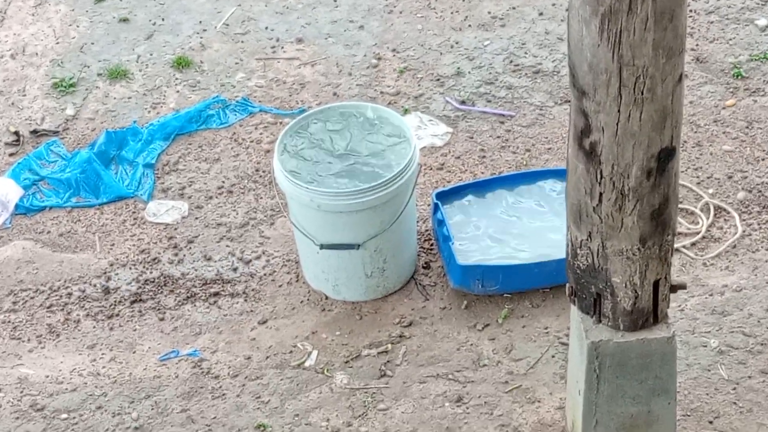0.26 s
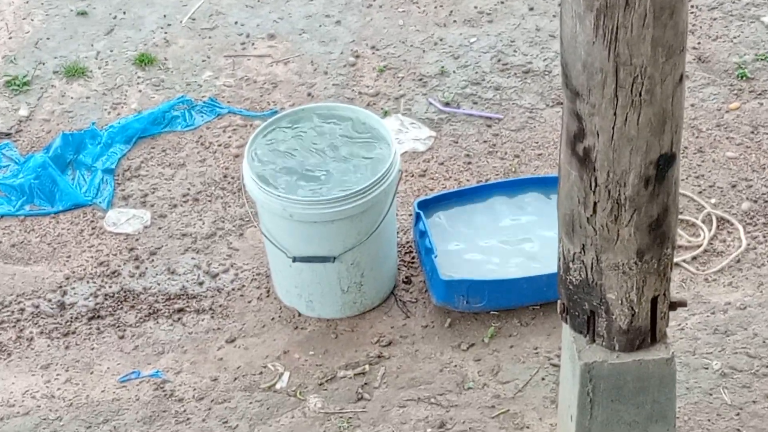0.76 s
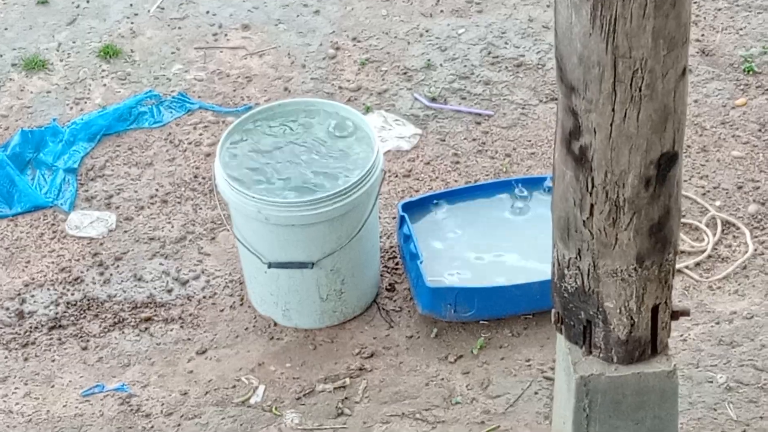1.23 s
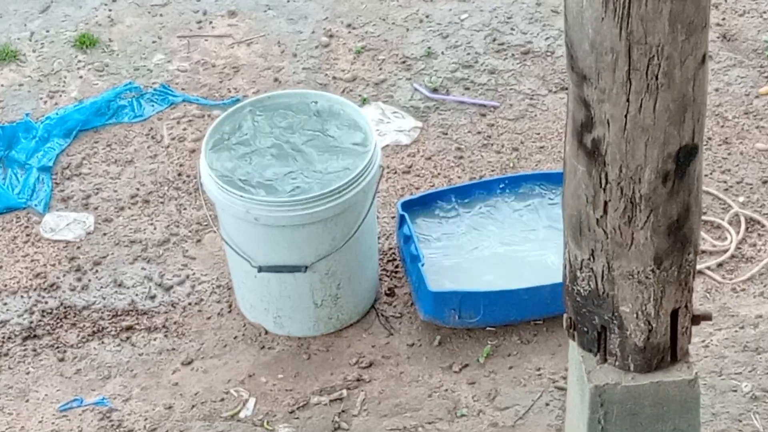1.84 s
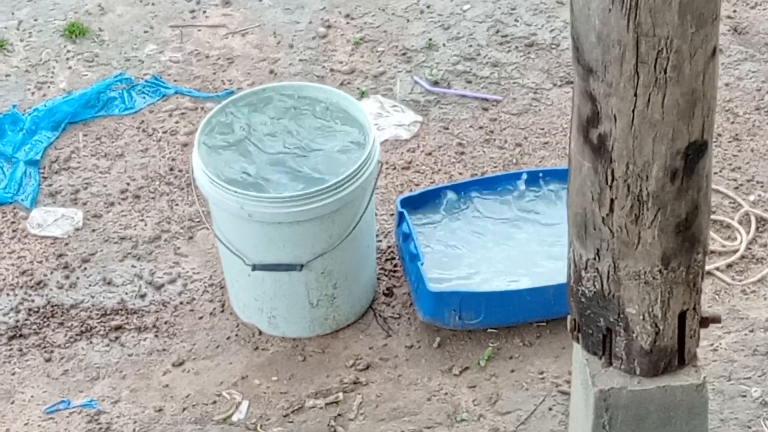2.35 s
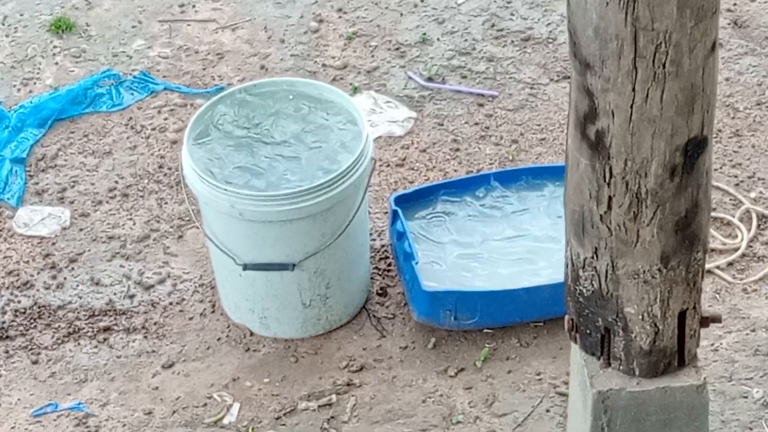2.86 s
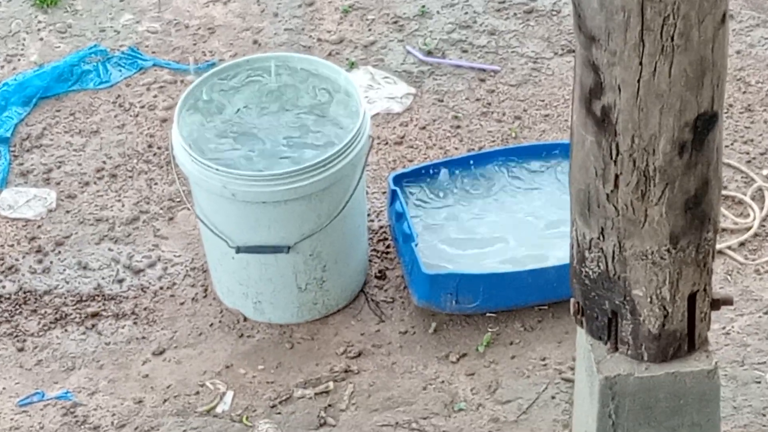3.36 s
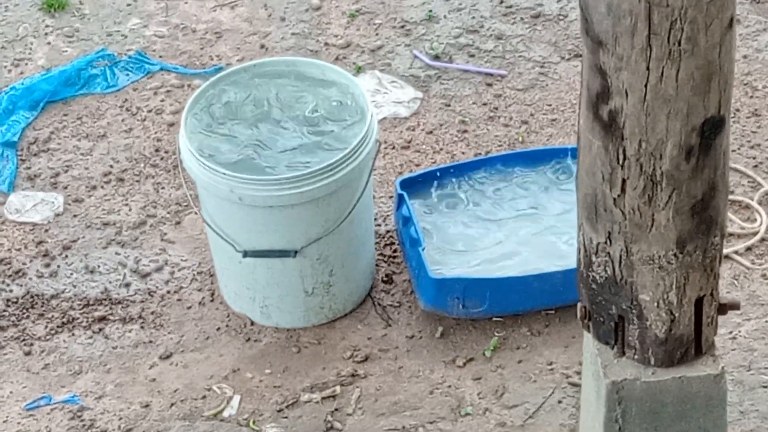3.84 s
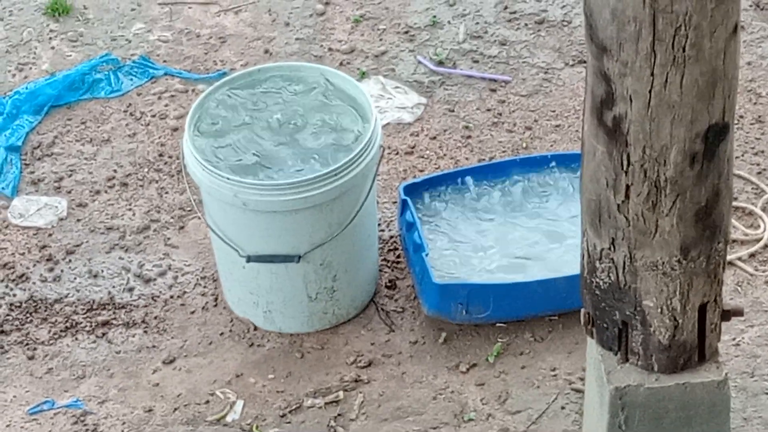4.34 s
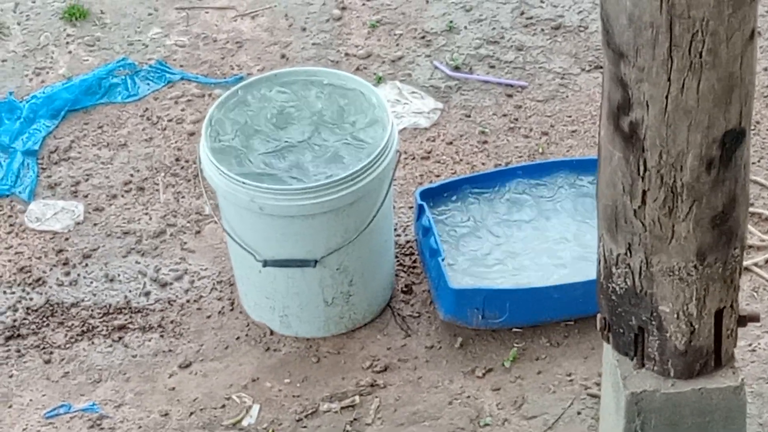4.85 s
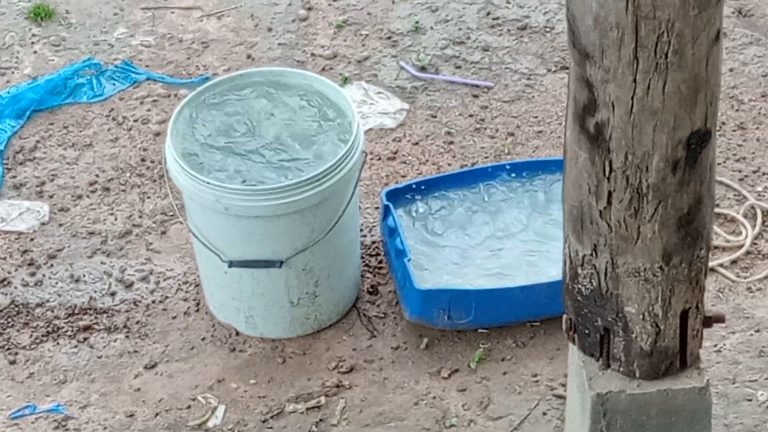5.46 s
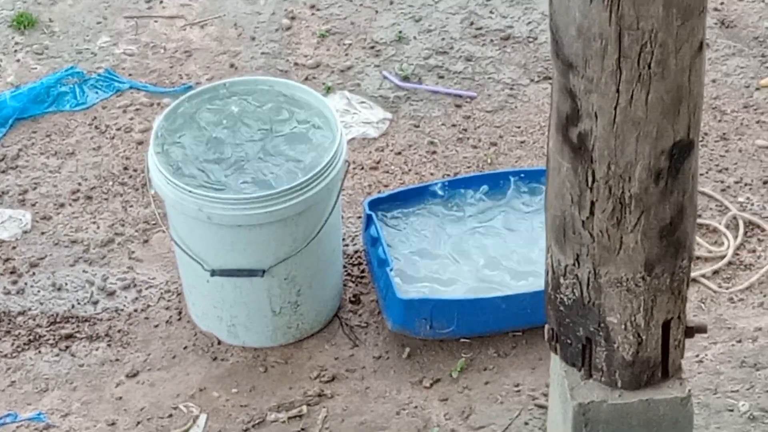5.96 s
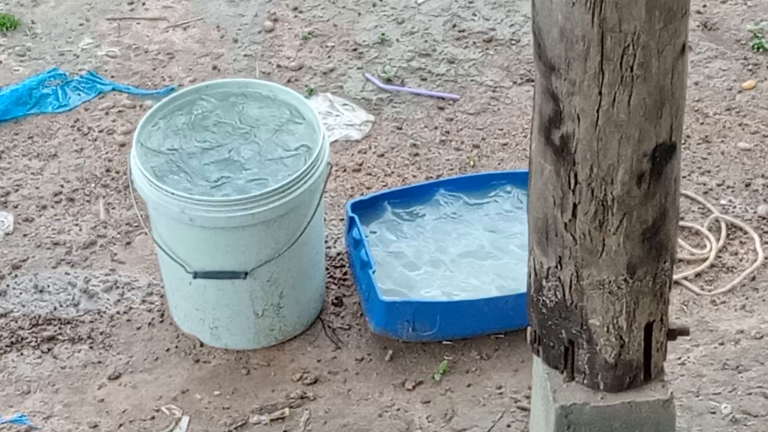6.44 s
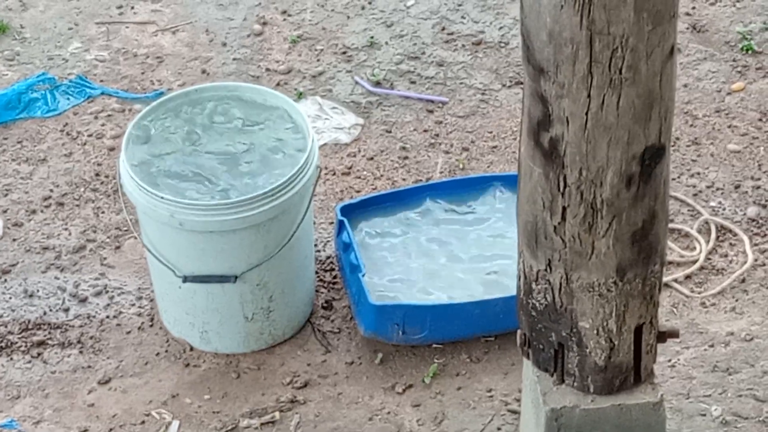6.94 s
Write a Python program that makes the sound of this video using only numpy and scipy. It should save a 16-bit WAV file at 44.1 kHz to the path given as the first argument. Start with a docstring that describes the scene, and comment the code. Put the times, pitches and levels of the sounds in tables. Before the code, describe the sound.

Continuous downpour heard from beneath a roof sheet, outdoors. Thousands of overlapping drops make a rattling, midrange-bright roar that wavers slightly, briefly dipping around a third of the way through and easing near the end. Heavy drops smack the sheet at random. Clear watery plinks stand out from containers nearby, most strongly early and midway, over faint rumble, dull knocks and distant rain hiss.

```python
"""Rain under a sheet roof

A farm yard in steady rain, with the microphone under a sheet roof.
Overhead, random drops keep noise bands ringing in a dense, bright wash; listed heavy drops splash out of it.
Close by, drops excite short resonances on wet ground, hiss on mud, and trap bubbles (decaying sines)
in a full bucket and a tub. Behind lie a soft drumming, a few dull knocks and hiss from across the yard."""
import sys
import numpy as np
from scipy import signal
from scipy.fft import rfft, irfft
from scipy.io import wavfile

SR = 44100
rng = np.random.default_rng(int(sys.argv[2]) if len(sys.argv) > 2 else 0)


def master(y):
    """Save y as 16-bit WAV."""
    cut = np.clip(np.atleast_2d(y).T, -1, 1)
    pcm = np.round(cut * 32767)  # scale
    wavfile.write(sys.argv[1], SR, pcm.astype(np.int16))


N = 317520

# All spectra are relative: each noise is scaled to rms 1 before its level is set.
# strength of the shower: (time [s], level [dB])
SHOWER = [(0.0, -1.5), (0.45, -0.7), (0.95, 0.5), (1.33, -1.1), (1.48, 1.2), (1.9, 0.5), (2.25, 0),
          (2.39, -3.5), (2.5, 0), (2.85, 0.9), (3.24, 0.4), (3.6, 0.7), (4.9, 0.6), (5.15, -0.64),
          (5.92, -0.2), (6.1, -1), (6.6, -2), (7.2, -1.7)]
# broad ring of the roof sheet: (frequency [Hz], density [dB per Hz])
ROOF_SPECTRUM = [(500, -32), (1100, -13.5), (1400, -14.5), (1650, -8), (1900, -3.5), (2400, -0.5),
                 (2750, -4), (3150, -6.5), (3700, -2.5), (4150, -8.5), (4800, -17.5), (5700, -25.5),
                 (8000, -33.5), (16000, -59)]
# fine spray of bursting drops: (frequency [Hz], density [dB per Hz])
SPRAY_SPECTRUM = [(2500, -27), (4500, 7), (6000, -3), (7000, -2.5), (7700, -7.5), (8800, -3), (9500, -3.5),
                  (10400, -13), (11500, -15.5), (12800, -21), (15500, -35)]
# heavy drops on the roof: (time [s], splash drive [dB], sheet drive [dB])
HEAVY_DROPS = [(0.3465, -35, -21), (0.4178, -33, -30), (0.5515, -36, -36), (0.8794, -38, -26),
               (1.2619, -38, -22), (1.4244, -47, -17.5), (1.5940, -41, -21), (1.7850, -44, -22),
               (1.8294, -34, -36), (1.9394, -33.5, -18), (2.1144, -34, -19.5), (2.2262, -32, -19),
               (2.3116, -39, -20.5), (2.4250, -45, -20), (2.4994, -35, -32), (2.6958, -39, -22),
               (2.8300, -43, -19), (3.0994, -41, -22), (3.3831, -33, -24.5), (3.4480, -36, -23),
               (3.5994, -35, -22), (3.6230, -44, -22), (3.7084, -29, -21.5), (4.4222, -35, -26),
               (4.5060, -35, -33), (4.5480, -36, -20), (4.74, -34, -18), (4.8323, -33, -37),
               (4.9121, -31, -24), (4.9294, -37, -21), (6.0494, -37, -19.5), (6.0979, -36, -19.5),
               (6.3294, -38, -21.5), (6.851, -34, -23), (6.9595, -37, -19.5), (7.0420, -36, -21.5)]
# splash of a large drop: (frequency [Hz], density [dB per Hz])
SPLASH_SPECTRUM = [(2500, -25), (4500, 7.5), (6000, 4), (7700, -6.5), (9500, -0.5), (11500, -14.5),
                   (13000, -20), (15500, -24)]
# low resonance of the sheet: (frequency [Hz], density [dB per Hz])
LOW_RING_SPECTRUM = [(400, -20), (740, -7), (875, 4.5), (970, 3.5), (1035, 1), (1085, -0.5), (1200, -5),
                     (2000, -41.5)]
# runs of drips that swell the low resonance: (start [s], length [s], level [dB])
DRIP_RUNS = [(0.076, 0.15, -31), (0.555, 0.12, -30), (0.908, 0.24, -33.5), (2.075, 0.11, -30.5),
             (2.53, 0.068, -27.5), (2.82, 0.22, -32.5), (3.37, 0.15, -32), (4.635, 0.15, -33.5),
             (4.85, 0.092, -32), (6.03, 0.15, -33.5)]
# resonances of a near drop on wet ground: (frequency [Hz], width [Hz], relative gain [dB])
TICK_MODES = [(970, 1150, 3), (2420, 930, -0.5), (3700, 400, -23), (6300, 1800, -44), (9400, 1200, -27)]
# clear plinks on the water: (time [s], relative level [dB], starting pitch [Hz])
PLINKS = [(1.595, 2, 2610), (1.817, 5, 2360), (3.3243, 2, 3710), (3.6244, 3, 3720), (3.6596, 3, 2440),
          (4.7724, -4, 2280), (5.9677, -3, 2580)]
# dull drumming of the whole roof and far rain: (frequency [Hz], density [dB per Hz])
DRUMMING_SPECTRUM = [(20, -36), (36, -29), (48, -31), (62, -14), (90, -8.5), (125, -1.5), (210, 2),
                     (300, -0.5), (450, -2), (700, 0), (1100, -8), (2000, -1), (6000, -31)]
# dull knocks among the drumming: (time [s], level before swell and doubling [dB], pitch [Hz])
KNOCKS = [(1.5, -31, 184), (2.91, -30, 190), (5.23, -36, 383), (5.284, -29, 198), (5.765, -26, 590)]
# steady hiss of the rain across the yard: (frequency [Hz], density [dB per Hz])
YARD_SPECTRUM = [(600, -9), (1500, 10), (3000, 5), (4500, -5), (6000, -25), (9500, -14), (12000, -27.5),
                 (15500, -34)]

# levels with the shower at 0 dB
WASH_DB, SPRAY_DB, LOW_RING_DB = -22.5, -43.5, -36.5
TICKS_DB, DROPLETS_DB, SPATTER_DB, BUBBLES_DB = -37.5, -43.5, -48.5, -35
SPRAY_FOLLOWS, LOW_RING_FOLLOWS = 2.3, 0.34  # dB per dB of the shower
# levels apart from the shower (dB); PLINKS_DB is added to each plink's own level
PLINKS_DB, DRUMMING_DB, YARD_DB = -12.5, -34, -34


def roof(shower_db):
    """Drops overhead drive the sheet's dense modes and burst into spray, which dies sooner."""
    sheet_modes = mode_groups(692, 8030, per_s=290, spread_db=4.0, t60=0.33, common=0.66, count=14)
    wash = from_db(WASH_DB + shower_db) * shaped(sheet_modes, ROOF_SPECTRUM)
    splashes = mode_groups(3220, 18000, per_s=390, spread_db=-2.0, t60=0.092, common=1.4, count=9)
    spray = from_db(SPRAY_DB + SPRAY_FOLLOWS * shower_db) * shaped(splashes, SPRAY_SPECTRUM)
    flurries = patter(drops(per_s=950, spread_db=2.7), t60=0.23)  # drops arrive in clumps
    return (wash + spray) * flurries


def heavy_drops(splash_t60=0.15, sheet_t60=0.3, burst_s=0.0028):
    """A heavy drop breaks up over a few milliseconds and sets the whole sheet ringing for a moment."""
    energy = np.zeros((2, N))
    for s, splash_db, sheet_db in HEAVY_DROPS:
        energy[:, round(s * SR)] = from_db([splash_db, sheet_db]) ** 2
    lag = np.exp(-1 / (burst_s * SR))
    splash_energy, sheet_energy = signal.lfilter([1 - lag], [1, -lag], energy + 1e-18)
    splash = noise(SPLASH_SPECTRUM) * np.sqrt(dying(splash_energy, splash_t60))
    sheet = noise(ROOF_SPECTRUM) * np.sqrt(dying(sheet_energy, sheet_t60))
    return splash + sheet


def low_ring(shower_db, edge_s=0.061):
    """The sheet's low resonance is kept going by the rain and swells under each run of drips."""
    t = np.arange(N) / SR
    rain_level = from_db(LOW_RING_DB + LOW_RING_FOLLOWS * shower_db)
    power = (rain_level * patter(drops(per_s=70, spread_db=3.0), t60=0.68)) ** 2
    for start, length, level_db in DRIP_RUNS:
        # the nearer end of the run sets the slope
        swell = np.clip(np.minimum(t - start, start + length - t) / edge_s, 0, 1)
        power = power + from_db(level_db) ** 2 * swell
    return np.sqrt(power) * noise(LOW_RING_SPECTRUM)


def ground_ticks(soft_hz=4600):
    """Near drops excite damped ground resonances as short dry ticks, each with its own strength and sign."""
    hits = drops(per_s=220, spread_db=4.0)
    ticks = np.zeros(N)
    for hz, width_hz, db in TICK_MODES:
        # a fresh draw for each resonance gives every tick a colour of its own
        strikes = hits * rng.uniform(-1.06, 1, N)
        ticks += resonance(strikes, hz, width_hz) * from_db(db)
    soften = signal.butter(4, soft_hz, fs=SR, output="sos")
    return rms_one(signal.sosfilt(soften, ticks))


def droplets(count=1800, low_hz=3300, high_hz=11500, cycles=62.0, spread_db=2.3):
    """Tiny droplets thrown off by the splashes ring briefly, each at a pitch of its own."""
    out = np.zeros(N)
    for when, pitch, size in rng.random((count, 3)):
        size_db = spread_db * min(-np.log(size), np.pi)
        hz = low_hz * (high_hz / low_hz) ** pitch
        add(out, when * N / SR, from_db(size_db) * bubble(hz, cycles, rise=0.003))
    return shaped(out, SPRAY_SPECTRUM)


def spatter(t60=0.057):
    """Near drops burst on the mud, each a sudden, short hiss."""
    bursts = patter(drops(per_s=52, spread_db=2.0), t60)
    return bursts * noise(SPLASH_SPECTRUM)


def bubbles(count=560, low_hz=1750, high_hz=4200, cycles=14.3):
    """Drops into bucket and tub trap bubbles of many sizes, most of them faint."""
    out = np.zeros(N)
    for when, pitch, size, life in rng.random((count, 4)):
        hz = low_hz * (high_hz / low_hz) ** pitch
        add(out, when * N / SR, size ** 2 * bubble(hz, cycles * (0.5 + life)))
    return rms_one(out)


def plinks(cycles=5.0):
    """The largest drops on the water trap bubbles that stand out singly."""
    out = np.zeros(N)
    for s, relative_db, hz in PLINKS:
        add(out, s, from_db(relative_db + PLINKS_DB) * bubble(hz, cycles))
    return out


def drumming():
    """The sheet's slow bending modes give a soft, lumpy rumble, with steady noise beneath."""
    thuds = mode_groups(45.3, 2455, per_s=190, spread_db=3.5, t60=0.27, common=0.68, count=9)
    return shaped(thuds + 0.23 * rng.standard_normal(N), DRUMMING_SPECTRUM)


def knocks(t60=0.095, rise_s=0.01):
    """Now and then a dull, low tone swells quickly and dies exponentially."""
    out = np.zeros(N)
    t = np.arange(SR // 2) / SR
    for s, level_db, hz in KNOCKS:
        envelope = from_db(level_db - 60 * t / t60) * (1 - np.exp(-t / rise_s))
        add(out, s, envelope * 2 * np.sin(2 * np.pi * hz * t))
    return out


def yard():
    """Rain across the yard blends into steady, coloured noise."""
    return noise(YARD_SPECTRUM)


def drops(per_s, spread_db):
    """Drops land at random, their dB exponentially spread: rare ones large, or faint if the spread is negative."""
    chance = rng.random(N) * SR / per_s
    lands = chance < 1
    hits = np.zeros(N)
    hits[lands] = from_db(spread_db * np.minimum(-np.log(chance[lands]), 3.5))
    return hits


def dying(energy, t60):
    """Energy put into the sheet adds up and leaks away, by 60 dB in t60 seconds."""
    keep = np.exp(-2 * np.log(1000) / (t60 * SR))
    return signal.lfilter([1], [1, -keep], energy + 1e-18)


def patter(hits, t60):
    """Amplitude of a surface struck again and again; rms 1."""
    already_ringing = np.concatenate([hits[-SR:], hits])  # one second of lead-in
    energy = dying(already_ringing ** 2, t60)[SR:]
    return rms_one(np.sqrt(energy))


def mode_groups(low_hz, high_hz, per_s, spread_db, t60, common, count):
    """Each spot of the sheet favours its own group of modes; some drops reach all groups at once."""
    edges = np.geomspace(low_hz, high_hz, count + 1)
    white = rng.standard_normal((2, N))
    broad_hits = common * drops(per_s, spread_db)
    out = np.zeros(N)
    for k, band in enumerate(zip(edges, edges[1:])):
        band_filter = signal.butter(2, band, "band", fs=SR, output="sos")
        modes = signal.sosfilt(band_filter, white[k % 2])  # neighbours use different noise
        out += modes * patter(broad_hits + drops(per_s, spread_db), t60)
    return out


def bubble(hz, cycles, rise=0.044):
    """A trapped bubble swells within a cycle, decays by 1/e in the given cycles and rises in pitch."""
    turns = np.arange(0, 2 * np.pi * cycles, hz / SR)
    age = turns / cycles
    envelope = (1 - np.exp(-2 * turns)) * np.exp(-age)
    return envelope * np.sin(2 * np.pi * turns * (1 + rise * age / 2))


def resonance(x, hz, width_hz):
    """Two-pole resonance with a gain of about 1 at its peak."""
    r = np.exp(-np.pi * width_hz / SR)
    feed = np.array([1, 0, -1]) * (1 - r * r) / 2
    return signal.lfilter(feed, [1, -2 * r * np.cos(2 * np.pi * hz / SR), r * r], x + 1e-18)


def shaped(x, spectrum):
    """Weight a signal by the given spectrum, joined on a log frequency axis; rms 1."""
    hz, level_db = np.transpose(spectrum)
    bins = np.maximum(np.fft.rfftfreq(N, 1 / SR), 1)
    gain = from_db(np.interp(np.log(bins), np.log(hz), level_db))
    return rms_one(irfft(rfft(x) * gain, N))


def noise(spectrum):
    """Steady noise with the given spectrum; rms 1."""
    return shaped(rng.standard_normal(N), spectrum)


def from_db(db):
    """Decibels to gain."""
    return 10 ** (np.asarray(db) / 20)


def rms_one(x):
    """Scale to an rms of 1."""
    return x / np.sqrt(np.mean(x ** 2) + 1e-20)


def add(out, s, sound):
    """Mix a sound in at s seconds."""
    start = round(s * SR)
    out[start:start + len(sound)] += sound[:N - start]


def scene():
    """Wash, spray, low ring, ground and bubbles follow the shower; the other layers keep their own levels."""
    times, levels_db = np.transpose(SHOWER)
    shower_db = np.interp(np.arange(N) / SR, times, levels_db)
    overhead = roof(shower_db) + heavy_drops() + low_ring(shower_db)
    ground = from_db(TICKS_DB) * ground_ticks() + from_db(DROPLETS_DB) * droplets()
    ground += from_db(SPATTER_DB) * spatter()
    water = from_db(BUBBLES_DB) * bubbles()
    close_by = from_db(shower_db) * (ground + water) + plinks()
    background = from_db(DRUMMING_DB) * drumming() + knocks() + from_db(YARD_DB) * yard()
    return (overhead + close_by + background)[None]


def record(dry):
    """The microphone loses the deepest bass; the top is cut steeply."""
    bass_cut = signal.butter(3, 48, "high", fs=SR, output="sos")
    top_cut = signal.ellip(12, 0.1, 80, 15480, fs=SR, output="sos")
    return signal.sosfilt(top_cut, signal.sosfilt(bass_cut, dry))


dry = scene()
out = record(dry)
master(out)
```